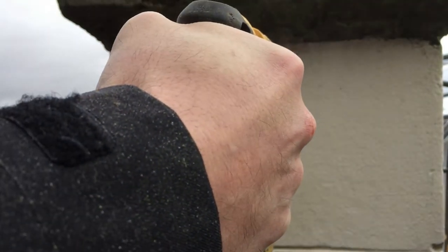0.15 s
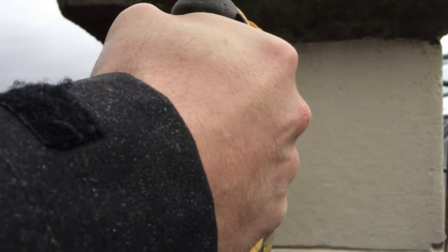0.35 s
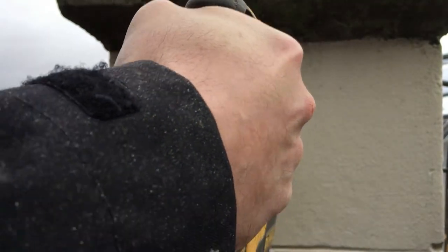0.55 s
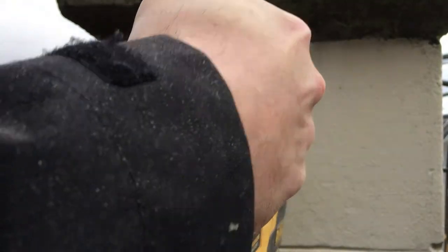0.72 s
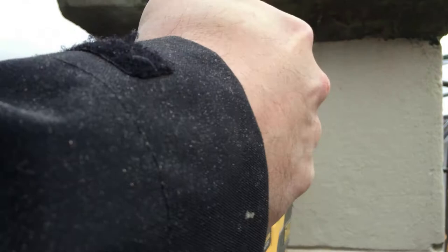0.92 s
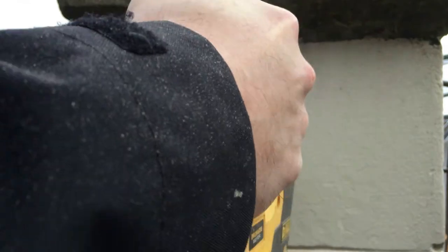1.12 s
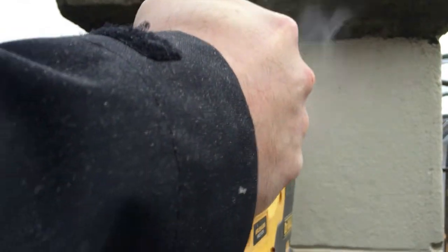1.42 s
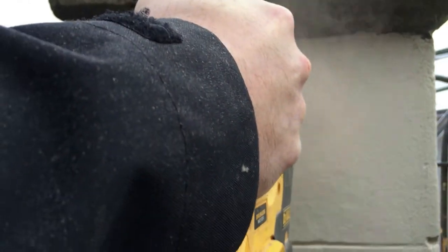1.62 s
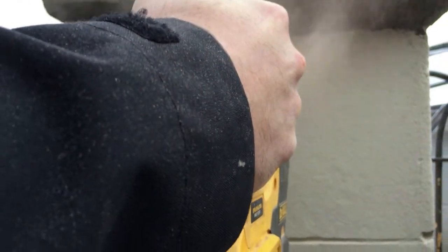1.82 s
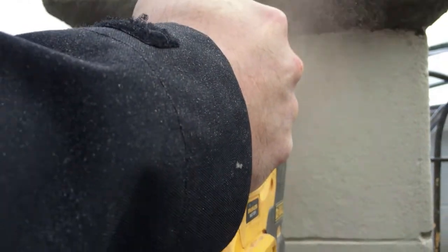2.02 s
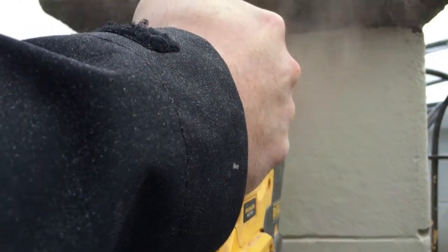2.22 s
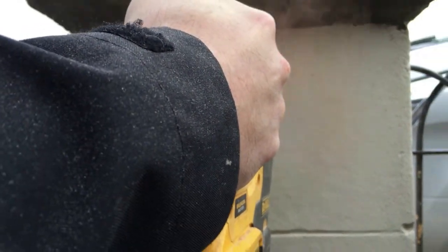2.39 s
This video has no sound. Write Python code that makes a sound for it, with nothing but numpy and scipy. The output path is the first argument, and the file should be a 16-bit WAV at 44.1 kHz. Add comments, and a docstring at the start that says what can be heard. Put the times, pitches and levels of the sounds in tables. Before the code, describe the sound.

A cordless hammer drill, close and dry outdoors: near quiet, light clicks, four brief whirring squeezes with ratchet snaps and knocks, then the motor runs up and hammers steadily into masonry until the end.

```python
"""A cordless hammer drill works on a masonry pillar outdoors, close by, above a light rumble of wind.
First come small clicks and four short squeezes of the trigger: gears whirr, the ratchet snaps over its
teeth, and there are dull knocks and brake clatter. Then the motor runs up and hammers steadily: each
blow thumps the housing, rattles the chuck and cracks the stone while the bit grinds and squeaks once.
The sounds are filtered noise and impulses; impulses timed by the motor's speed make the blows."""
import sys
import numpy as np
from scipy import signal
from scipy.fft import rfft, irfft, next_fast_len
from scipy.io import wavfile

SR = 44100
rng = np.random.default_rng(int(sys.argv[2]) if len(sys.argv) > 2 else 0)


def persist_wave(psi):
    """Save psi, clipped to +-1, as 16-bit WAV."""
    counts = np.round(np.clip(psi, -1, 1) * 32767).astype(np.int16)
    wavfile.write(sys.argv[1], SR, np.atleast_2d(counts).T)


N = 112454
TIME = np.arange(N) / SR  # seconds

# The motor runs up for the long run. Each row: time in seconds, speed in blows per second.
SPIN_UP = [(1.188, 12), (1.205, 33), (1.222, 61), (1.237, 77), (1.248, 108.6), (1.272, 159)]
# The steady run that follows. Each row: time in seconds, speed in blows per second.
RUN_SPEED = [(1.29, 153.3), (1.37, 151.7), (1.47, 153.0), (1.56, 153.7), (1.65, 152.8), (1.73, 154.1),
             (1.8, 152.8), (1.88, 152.9), (1.96, 153.7), (2.06, 152.8), (2.14, 152.9), (2.23, 152.0),
             (2.33, 153.3), (2.48, 153.6), (2.55, 153.7)]


def from_db(db):
    """Turn decibels into a factor for the waveform."""
    return 10 ** (np.asarray(db) / 20)


def curve(rows):
    """Join points of (seconds, value) by straight lines."""
    return np.interp(TIME, *np.transpose(rows))


def noise():
    """White noise with an rms level of 1."""
    return rng.standard_normal(N)


def flutter(rate_hz):
    """Random wavering with a spread of 1, made by smoothing noise twice."""
    r = np.exp(-2 * np.pi * rate_hz / SR)
    slow = signal.lfilter([1], [1, -2 * r, r * r], noise())
    return slow / slow.std()


def colour(x, points):
    """Filter to a (Hz, dB) shape without sounding early; white noise keeps its overall level."""
    size = next_fast_len(N + SR // 2) * 2
    hz, db = np.transpose(points)
    bin_hz = np.arange(size // 2 + 1) * SR / size
    # The 1 Hz shift avoids the logarithm of zero.
    gain = from_db(np.interp(np.log(bin_hz + 1), np.log(hz), db))
    gain = gain / np.sqrt(np.mean(gain ** 2))
    # Folding the cepstrum gives the filter with the least delay (minimum phase).
    cepstrum = irfft(np.log(gain))
    cepstrum[1:size // 2] *= 2
    cepstrum[size // 2 + 1:] = 0
    response = np.exp(rfft(cepstrum))
    return irfft(rfft(x, size) * response)[:N]


def impulses(s, gain):
    """One single-sample impulse at each time in seconds."""
    samples = np.clip(np.round(s * SR).astype(int), 0, N)
    return np.bincount(samples, gain, N + 1)[:N]


def bursts(hits, decay_s):
    """Each impulse starts a dying puff of noise."""
    fade = np.exp(-1 / (decay_s * SR))
    return signal.lfilter([1], [1, -fade], hits + 1e-18) * noise()


def ring(x, hz, t60):
    """One resonance, which dies by 60 dB in t60 seconds."""
    r = np.exp(-np.log(1000) / (t60 * SR))
    w = 2 * np.pi * hz / SR
    return signal.lfilter([np.sin(w), 0, -np.sin(w)], [1, -2 * r * np.cos(w), r * r], x) / (2 * np.sin(w))


def with_modes(x, modes):
    """A sound together with the ringing that it excites."""
    return x + sum(from_db(db) * ring(x, hz, t60) for hz, db, t60 in modes)


def running_at(db, x):
    """Scale a sound so that it has this level in dB during the steady run."""
    return from_db(db) * x / x[TIME > RUN_SPEED[0][0]].std()


def wind_and_air():
    """Gusts on the microphone and a faint distant hum: two noises, each with its own colour."""
    # Rise and fall of the wind. Each row: time in seconds, relative level in dB.
    wind_level = [(0.01, -44), (0.33, -60), (0.83, -56), (0.89, -44), (0.92, -55), (0.95, -33), (0.96, -31),
                  (1.01, -46.5), (1.06, -54), (1.2, -61), (1.44, -52), (1.52, -47.5), (1.58, -67),
                  (1.92, -51.5), (1.96, -57), (2.34, -49), (2.42, -48), (2.55, -60)]
    # Colour of the wind. Each row: frequency in Hz, relative level in dB per Hz.
    wind_colour = [(8, 3.5), (18, 5), (35, -3.5), (55, -11), (80, -18), (120, -26), (200, -34.5),
                   (500, -60), (2000, -97)]
    # Colour of the outdoor hum. Each row: frequency in Hz, relative level in dB per Hz.
    air_colour = [(60, 6.5), (150, 1), (250, -4.5), (450, -7), (750, -10), (1300, -15), (2500, -24),
                  (5000, -29), (15000, -35)]
    wind = from_db(1 + curve(wind_level)) * colour(noise(), wind_colour)
    air = from_db(-80.5) * colour(noise(), air_colour)
    return wind + air


def handling():
    """Small dry clicks and dull knocks around the squeezes: short puffs of filtered noise."""
    # The trigger clicks and gears take up slack. Each row: time in seconds, relative level in dB.
    click_rows = [(0.5434, -64), (0.5582, -53.5), (0.5913, -49), (0.6914, -67), (0.731, -56.5),
                  (0.7535, -44.5), (0.876, -57), (0.896, -54), (1.0194, -52), (1.1722, -53),
                  (1.1887, -71.5)]
    # Colour of the clicks. Each row: frequency in Hz, relative level in dB.
    click_colour = [(300, -13), (1500, 4), (3000, 0.5), (7000, 2), (10000, -2), (16000, -14)]
    # The drill jerks in the hand. Each row: time in seconds, relative level in dB.
    knock_rows = [(.588, -59), (0.645, -49), (.818, -53), (1.125, -61)]
    # Colour of the knocks. Each row: frequency in Hz, relative level in dB.
    knock_colour = [(50, -6), (90, 4), (210, 1), (290, -10), (380, -4), (480, -21), (620, -1), (900, -28),
                    (1400, -8), (3000, -37)]
    clicks_db, click_decay_s, knock_decay_s = -13.5, 0.0016, 0.0082

    s, db = np.transpose(click_rows)
    click_puffs = bursts(impulses(s, from_db(db + clicks_db)), click_decay_s)
    clicks = colour(click_puffs, click_colour)
    s, db = np.transpose(knock_rows)
    knock_puffs = bursts(impulses(s, from_db(db)), knock_decay_s)
    return clicks + colour(knock_puffs, knock_colour)


def tooth_drops(spin, one_at_s):
    """Times when the turning ratchet drops off a tooth, lined up so that one falls at one_at_s."""
    teeth = np.cumsum(spin) / SR
    teeth = teeth - np.interp(one_at_s, TIME, teeth)
    return TIME[1:][np.diff(np.floor(teeth)) > 0]


def motor():
    """Turning drives the rest: speed, ratchet and gear levels in dB, and times of the tooth drops."""
    # Short squeezes of the trigger. Each row: time of top speed in seconds, top speed in blows
    # per second, speed-up in seconds, braking in seconds, relative ratchet and gear levels in dB.
    squeezes = [(0.6459, 110, 0.067, 0.043, -2.5, 0.5), (0.81, 133, 0.067, .048, -1.5, -2.5),
                (.958, 118, 0.067, 0.056, 1, 1.5), (1.1067, 130, 0.068, 0.051, 1.5, -2.5)]
    # Ratchet and crack strength in the long run. Each row: time in seconds, relative level in dB.
    crack_level = [(1.23, 6), (1.29, 5), (1.34, 3), (1.42, 4.5), (1.6, 5.5), (1.85, 5.5), (2.1, 3),
                   (2.3, 4), (2.55, 1)]
    bite_s = 1.2517  # first blow that bites the stone
    run_gears_db = -3.0  # gear level of the long run, on the same scale as the squeezes

    speed = curve(list(SPIN_UP) + list(RUN_SPEED)) * (TIME >= SPIN_UP[0][0])
    drops = [tooth_drops(speed, bite_s)]
    ratchet_db = curve(crack_level)
    gear_db = np.full(N, run_gears_db)
    for s, top, up_s, brake_s, click_db, whirr_db in squeezes:
        spin = top * np.interp(TIME, [s - up_s, s, s + brake_s], [0, 1, 0])
        drops.append(tooth_drops(spin, s))
        speed = speed + spin
        ratchet_db[spin > 0] = click_db
        gear_db[spin > 0] = whirr_db
    return speed, ratchet_db, gear_db, np.concatenate(drops)


def gears(speed, gear_db, load):
    """A rough, ringing whirr that grows with speed, calms under load and clatters on braking."""
    # Colour of motor and gears. Each row: frequency in Hz, relative level in dB per Hz.
    gear_colour = [(50, -5.5), (95, 4), (200, 0.5), (290, -1.5), (400, -2), (650, -2.5), (1000, -7.5),
                   (1350, 3.5), (1750, -2), (2600, -7.5), (3500, -3.5), (4800, -6.5), (7500, -8.5),
                   (10000, -17.5), (16000, -15.5)]
    # The gearbox rings. Each row: frequency in Hz, level in dB, time to die by 60 dB in seconds.
    gear_modes = [(207, -56.5, 0.13), (360, -65, 0.02), (597, -48, 0.079), (1342, -38.5, 0.018),
                  (1550, -51, 0.016), (1710, -35.5, .04), (3520, -37, 0.023), (5900, -57, 0.017)]
    # The brake catches the gears. Each row: time in seconds, relative level in dB.
    brake_clatter = [(0.656, -55), (0.831, -49.5), (1.128, -52.5)]
    full_speed, power = 121.7, 1.47  # blows per second where the whirr stops growing; steepness
    base_db, loaded_db, rough_db, clatter_decay_s = -54, -2, 3.5, 0.009

    effort = np.clip(speed / full_speed, 0, 1) ** power
    level_db = base_db + gear_db + loaded_db * load + rough_db * flutter(250)
    whirr = noise() * effort * from_db(level_db)
    s, db = np.transpose(brake_clatter)
    clatter = bursts(impulses(s, from_db(db)), clatter_decay_s)
    return with_modes(colour(whirr + clatter, gear_colour), gear_modes)


def hammer(speed, ratchet_db, drops, load):
    """Tooth drops snap and thump faintly when free; under load they thump, rattle and crack the stone."""
    # Ratchet strength against speed. Each row: blows per second, relative level in dB.
    ratchet_force = [(8, -43), (25, -29), (45, -16.5), (72, -5), (105, 1.5), (155, 4)]
    # The housing answers a blow. Each row: frequency in Hz, relative level in dB.
    housing = [(70, -9), (150, 0.5), (300, -10), (460, -11.5), (612, -5.5), (765, -0.5), (920, -7),
               (1075, -40), (1225, -6), (1380, 1.5), (1690, 4), (1840, 1.5), (1990, 0.5), (2150, -5),
               (2800, -17), (4000, -13), (9000, -42)]
    # Colour of the chuck's rattle. Each row: frequency in Hz, relative level in dB per Hz.
    rattle_colour = [(200, -48), (700, -41), (1100, -31), (1350, 3.5), (1700, 5), (2100, -7), (2500, -6),
                     (2900, -20), (6000, -33)]
    # Unevenness of the rattle. Each row: time in seconds, relative level in dB.
    rattle_level = [(1.25, -4), (1.29, 2.5), (1.45, 6), (1.62, -0.5), (1.75, 3.5), (1.86, -3.5), (2.0, 3),
                    (2.55, -1)]
    # The tip bounces in each blow. Each row: seconds after the thump (minus: before), relative dB.
    bounces = [(-.0002, 3.5), (.0005, -15), (.00085, -0.5), (.0012, -4), (.002, -4.5)]
    # Crack of ratchet and tip. Each row: frequency in Hz, relative level in dB per Hz.
    crack_colour = [(500, -28.5), (2500, -18), (4000, -4.5), (5200, -2.5), (6200, 2), (7200, -3.5),
                    (9100, -2), (10000, -9.5), (13000, -8.5), (16000, -14.5)]
    # The steel bit rings. Each row: frequency in Hz, level in dB, time to die by 60 dB in seconds.
    bit_modes = [(3200, -28, 0.01), (3920, -29.5, .016), (6280, -42.5, 0.01), (7690, -41, 0.0092),
                 (11800, -34, 0.02)]
    # Snap of the free ratchet. Each row: frequency in Hz, relative level in dB per Hz.
    snap_colour = [(300, -13), (1500, 0.5), (2600, -14), (4000, -2.5), (6000, 2.5), (8500, -4),
                   (10500, -9.5), (13000, -8), (16000, -3.5)]
    thump_db, rattle_db, crack_db = -48.5, -55.5, -53  # levels in the steady run
    idle_db, snap_db = -24, -40  # share of thump without load; strength of free snaps
    thump_scatter_db, crack_scatter_db, jitter_s = 0.4, 1.1, 0.000008  # random spread
    rattle_decay_s, crack_decay_s, snap_decay_s = 0.0013, 0.00037, 0.0006
    crack_click, snap_noise = 2.3, 0.73  # click beside the puff; puff beside the click

    at = (drops * SR).astype(int)
    late, heavy = noise()[at], noise()[at]
    s = drops + jitter_s * late
    contact = np.clip(load[at], 0, 1)
    force = from_db(np.interp(speed[at], *np.transpose(ratchet_force)))

    weight = (load[at] + from_db(idle_db)) * from_db(thump_scatter_db * heavy)
    blows = impulses(s, force * weight)
    thump = running_at(thump_db, colour(blows, housing))
    rattle_puffs = bursts(blows * from_db(curve(rattle_level)), rattle_decay_s)
    rattle = running_at(rattle_db, colour(rattle_puffs, rattle_colour))

    force = force * from_db(ratchet_db[at])
    tips = np.zeros(N)
    for lag, db in bounces:
        bounce = from_db(db + crack_scatter_db * noise()[at])
        tips = tips + impulses(s + lag, force * contact * bounce)
    crack = colour(crack_click * tips + bursts(tips, crack_decay_s), crack_colour)
    crack = running_at(crack_db, with_modes(crack, bit_modes))

    free = impulses(s, force * (1 - contact) * from_db(snap_db))
    snap = colour(free + snap_noise * bursts(free, snap_decay_s), snap_colour)
    return thump + rattle + crack + snap


def grinding(load):
    """The flutes grind grit, as rough noise that follows the load; the bit squeaks once in its hole."""
    # Colour of the grit. Each row: frequency in Hz, relative level in dB per Hz.
    grit_colour = [(150, -17), (450, -14.5), (750, -2.5), (1100, -5.5), (1600, 0.5), (2400, 1.5),
                   (2900, -8), (6200, -8.5), (8800, -10.5), (10500, -18), (16000, -12.5)]
    grit_db, rough_db = -53.5, 3
    squeak_s, squeak_width_s, squeak_hz, squeak_t60_s = 1.98, 0.0073, 6060, 0.0071
    grit = colour(noise() * load * from_db(grit_db + rough_db * flutter(430)), grit_colour)
    # Ringing noise at -58 dB, let through only by a short bell-shaped swell.
    squeak = running_at(-58, ring(noise(), squeak_hz, squeak_t60_s))
    swell = np.exp(-((TIME - squeak_s) / squeak_width_s) ** 2)
    return grit + squeak * swell


def scene():
    """Wind and drill together; the load is how hard the bit bears on the stone."""
    # Pressure on the stone. Each row: time in seconds, relative level in dB.
    pressure = [(1.2, -45), (1.24, -8.5), (1.264, -7), (1.275, 4), (1.33, 1.5), (1.7, 1), (2.1, 1.5),
                (2.55, 0.5)]
    speed, ratchet_db, gear_db, drops = motor()
    load = from_db(curve(pressure)) * (TIME > SPIN_UP[0][0])
    drill = handling() + gears(speed, gear_db, load)
    drill = drill + hammer(speed, ratchet_db, drops, load) + grinding(load)
    return (wind_and_air() + drill)[None]


def record(dry):
    """Cut the treble steeply above 15850 Hz."""
    low_pass = signal.ellip(12, 0.1, 70, 15850, fs=SR, output="sos")
    return signal.sosfilt(low_pass, dry)


dry = scene()
out = record(dry)
persist_wave(out)
```